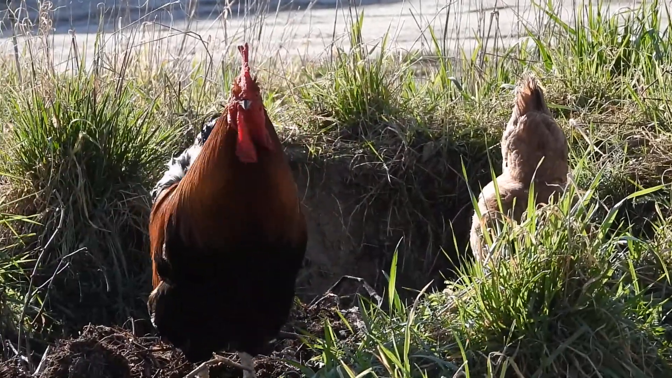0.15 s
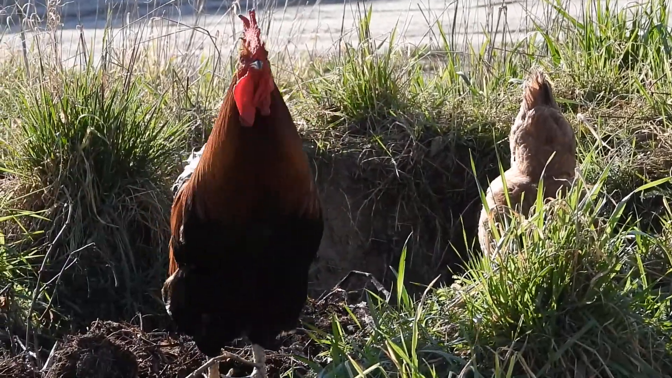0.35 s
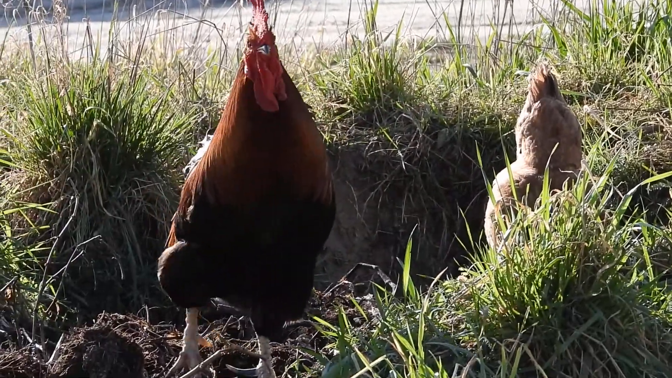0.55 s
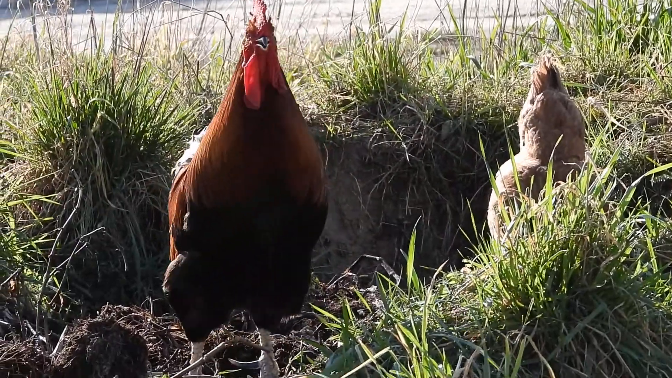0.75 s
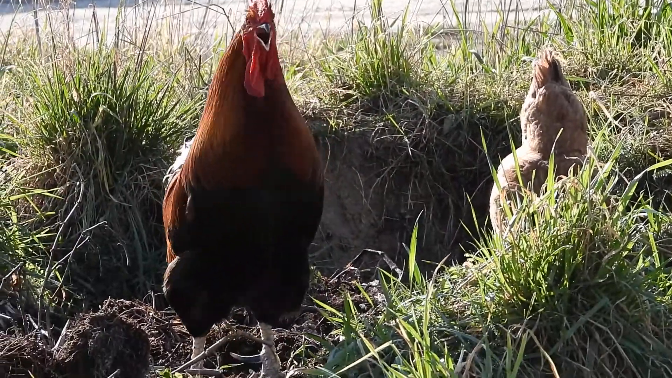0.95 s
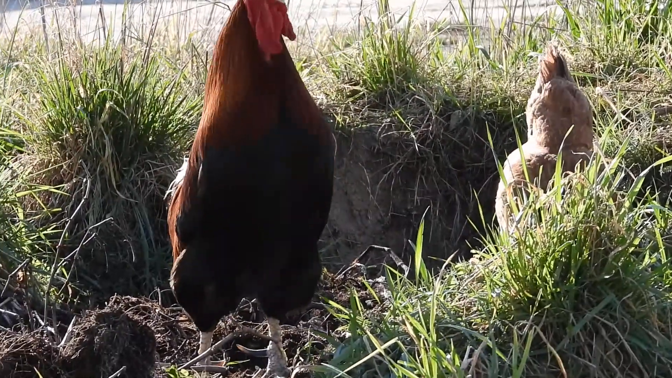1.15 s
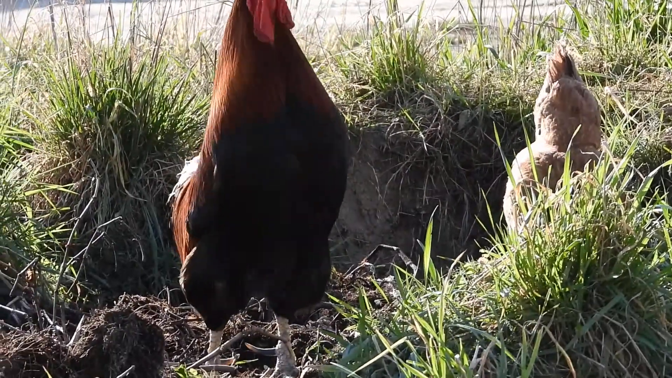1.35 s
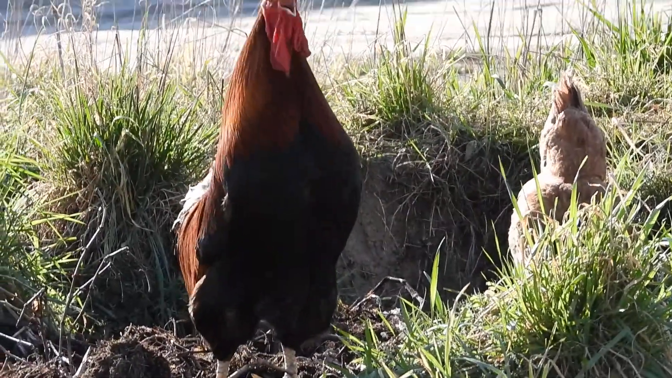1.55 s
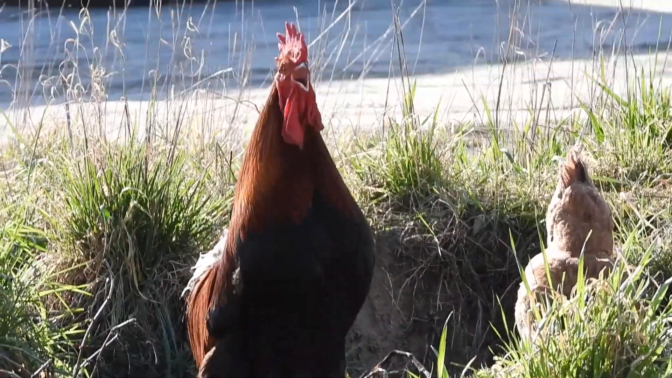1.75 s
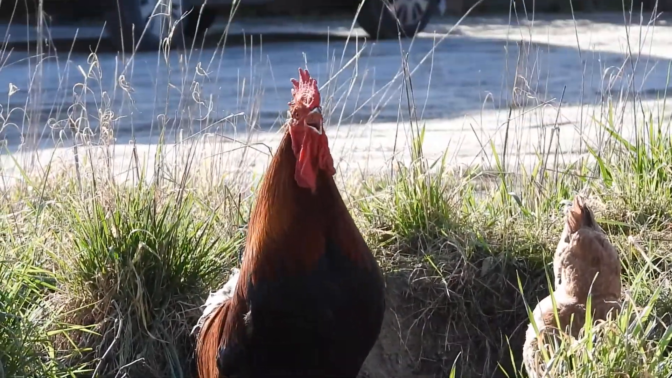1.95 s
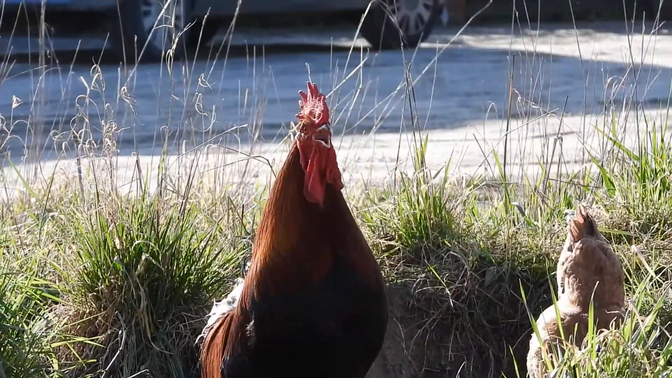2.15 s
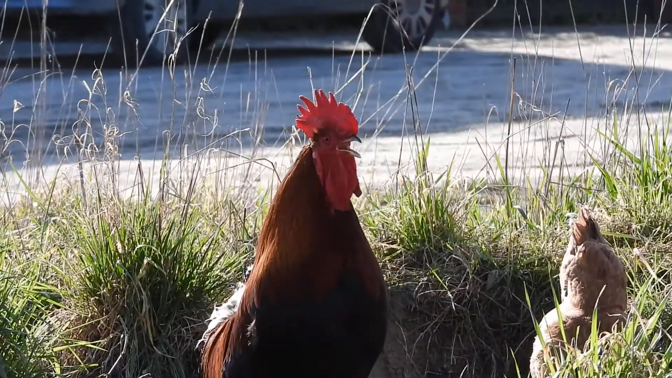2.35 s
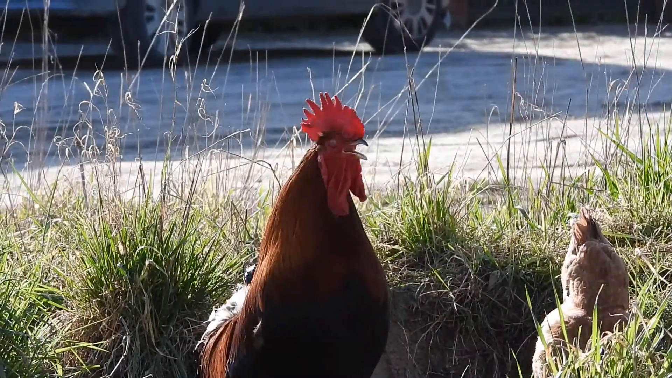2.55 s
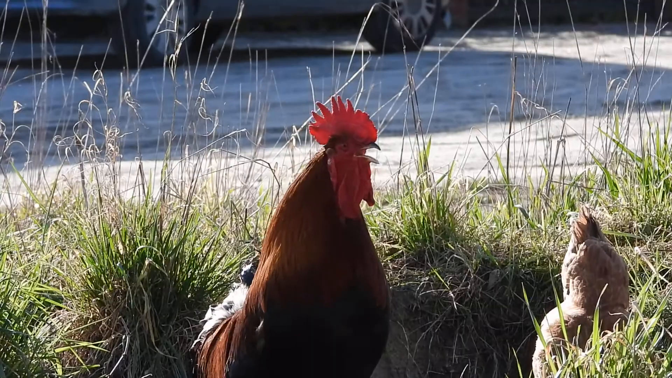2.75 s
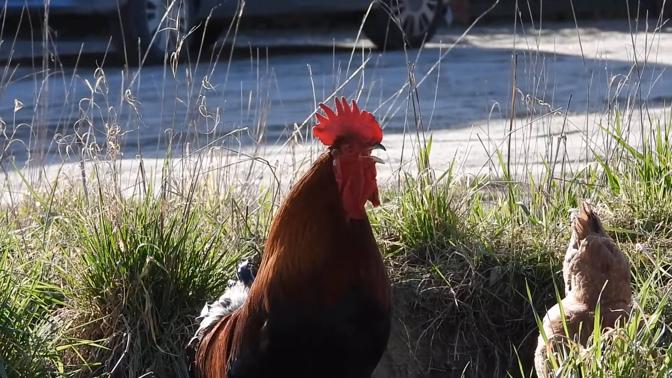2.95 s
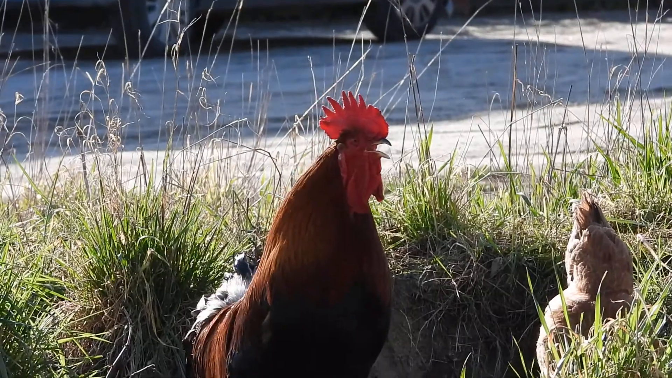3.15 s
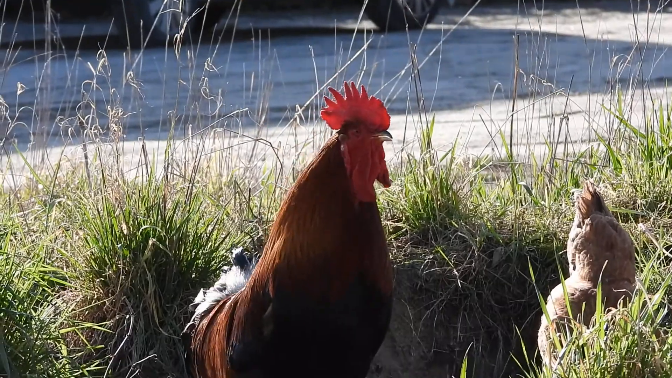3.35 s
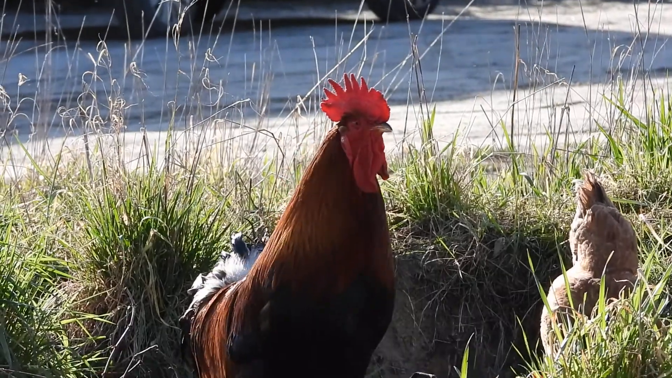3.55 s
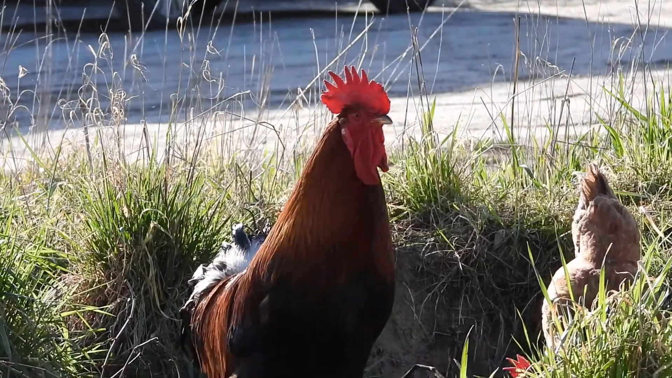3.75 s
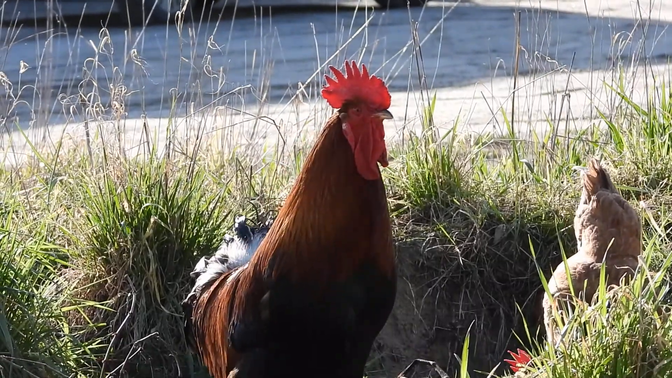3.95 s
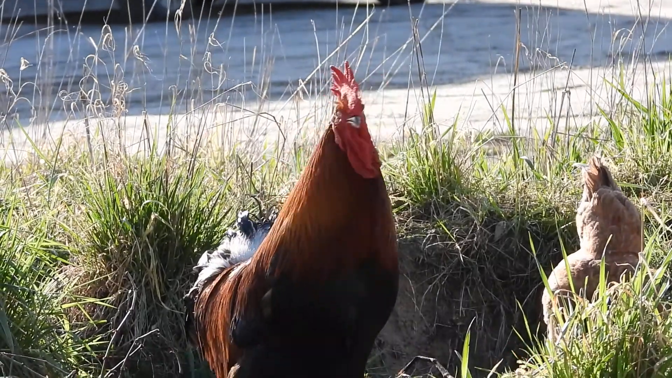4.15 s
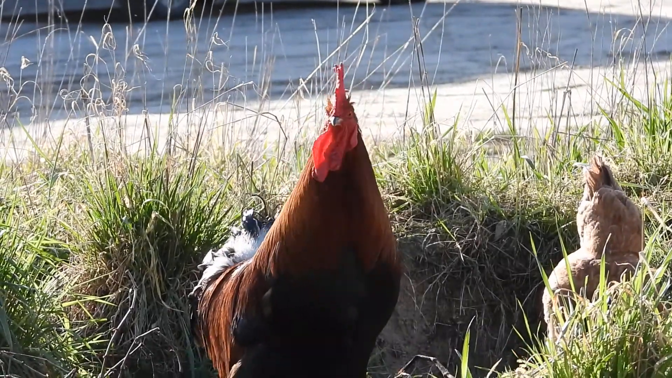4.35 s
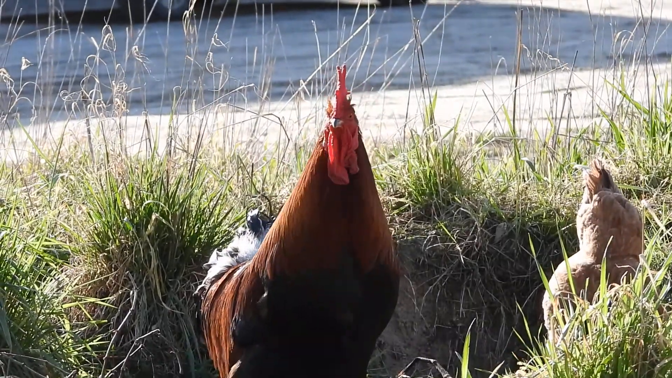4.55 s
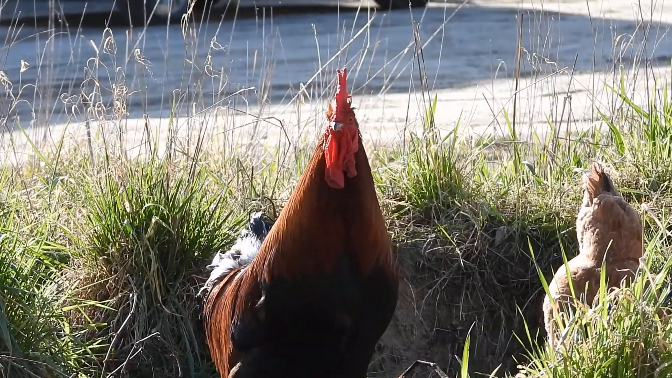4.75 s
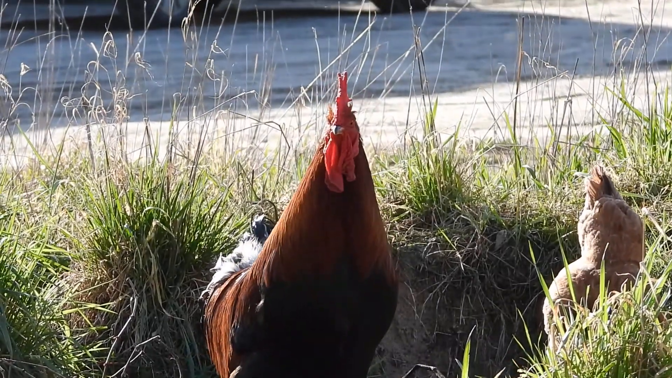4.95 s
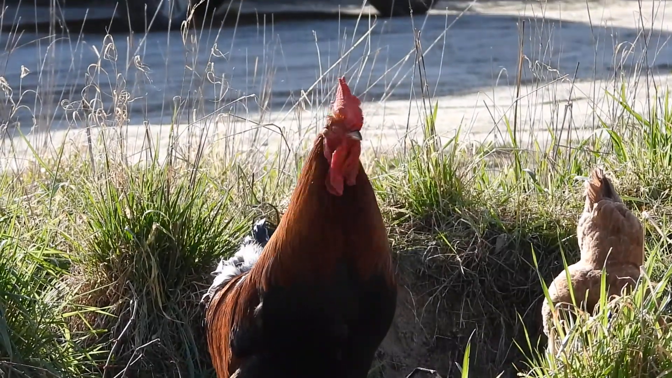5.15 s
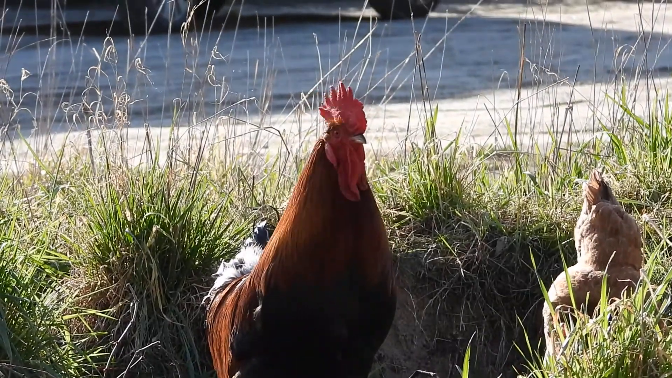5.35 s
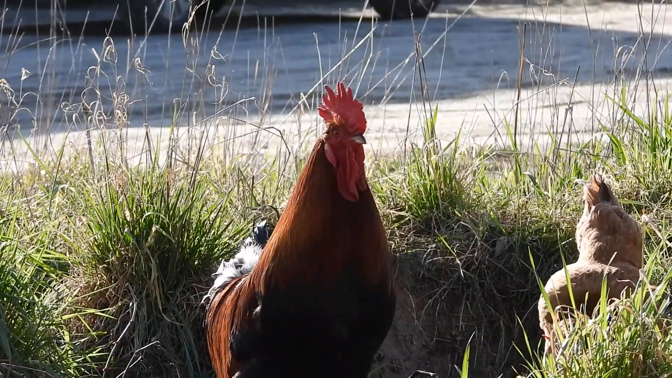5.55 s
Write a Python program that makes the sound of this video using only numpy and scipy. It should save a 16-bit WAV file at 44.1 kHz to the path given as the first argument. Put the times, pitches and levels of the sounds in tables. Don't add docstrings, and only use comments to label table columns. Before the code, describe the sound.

A rooster close by gives one loud, raspy, drawn-out crow over faint sparrow chirps, a soft hen cluck and low distant traffic hum.

```python
import sys
import numpy as np
from scipy import signal
from scipy.fft import rfft, irfft, next_fast_len
from scipy.io import wavfile
from scipy.ndimage import uniform_filter1d, minimum_filter1d, map_coordinates

SR = 44100
rng = np.random.default_rng(int(sys.argv[2]) if len(sys.argv) > 2 else 0)


def dump(signal):
    limited = np.clip(np.atleast_2d(signal).T, -1, 1)
    pcm = np.round(limited * 32767).astype(np.int16)
    wavfile.write(sys.argv[1], SR, pcm)


def boost_factor(decibels):
    exponent = np.asarray(decibels, float) / 20
    return 10 ** exponent


N = 247822

# time in seconds, level in dB.
TRAFFIC_LEVEL = [(0, -56), (1.1, -55.5), (1.3, -53.5), (2.5, -56), (3.3, -55), (3.6, -55), (4.5, -55.5),
                 (5.62, -56)]
# frequency in Hz, density in dB per Hz.
TRAFFIC_COLOUR = [(18, -99.5), (30, -48.5), (54, -60.5), (182, -7.5), (295, -9.5), (529, -5.5), (903, -4),
                  (974, -0.5), (1540, -10.5), (1700, -15), (3840, -19), (4250, -19.5), (5910, -30),
                  (8230, -32.5), (13000, -72)]
# frequency in Hz, likeness from -1 to 1.
STEREO_LIKENESS = [(60, 1), (130, 1), (290, 0.86), (640, 0.84), (1410, 0.58), (3100, -0.055), (6820, -0.28),
                   (15000, -0.26)]
# frequency in Hz, left minus right in dB.
BACKGROUND_TILT = [(60, -4.5), (110, -7), (200, -0.5), (380, 3), (700, 3), (1290, 3.5), (2380, 4.5),
                   (4400, 1), (8120, -5), (15000, -12)]
# time in seconds, length in seconds, level in dB.
GRASS_RUSTLES = [(.22, 0.041, -56.5), (0.469, 0.039, -50.5), (0.552, 0.027, -55), (.91, 0.059, -53),
                 (3.667, 0.027, -46.5), (5.463, 0.03, -50.5)]
# time in seconds, length in
# seconds, level in dB.
LOW_THUMPS = [(3.11, 0.03, -48), (3.17, 0.07, -52), (3.445, 0.016, -39)]
# frequency in Hz, time to fall 60 dB in seconds.
YARD_DECAY = [(300, 0.33), (550, 1), (1500, 0.75), (3500, 0.12), (8000, 0.36)]
# time in seconds, pitch in Hz, level in dB.
FLOCK_OUTBURSTS = [(.19, 4110, -58), (4.8, 3550, -60), (5.08, 4050, -62), (5.21, 3930, -51),
                   (5.57, 4090, -59.5)]
# time in seconds, pitch in Hz, level in dB.
FAR_WHISTLES = [
    [(.41, 2210, -47), (.425, 1950, -67), (.455, 1950, -49), (.47, 3360, -40), (.48, 4300, -45),
     (.495, 5000, -53), (.53, 5150, -68)],
    [(.5, 2520, -53), (.54, 2655, -50), (.6, 2660, -49), (.675, 2530, -57)],
    [(3.632, 3094, -63), (3.645, 3090, -51), (3.69, 3070, -48)],
    [(4.31, 2350, -65), (4.36, 2370, -45.5), (4.385, 2490, -46), (4.43, 2610, -50), (4.51, 2596, -55),
     (4.58, 2660, -75)],
    [(4.85, 8500, -78), (4.88, 8400, -72), (4.93, 8300, -77), (5.0, 8200, -78)],
]
# seconds after its start, pitch in Hz, level in dB.
SPARROW_CHIRP = [(0, 3300, -18), (.008, 3260, -1), (0.025, 5200, -2.5), (.042, 3380, 2), (0.048, 3030, -18),
                 (0.051, 3560, 14.5), (0.063, 3415, -0.5), (.069, 3400, -1), (0.084, 3350, -4)]
# start in seconds, level in dB, pitch factor, length factor,
# left minus right in dB.
SPARROW_CALLS = [(0.077, -49, .95, 1.1, 10.5), (3.03, -45.5, 1.07, 0.62, 8.5), (3.643, -45, 1.05, 0.88, 7),
                 (4.408, -46.5, 0.992, 0.82, 10.5), (5.442, -46, 1.014, 1.01, 7)]
# time in seconds, pitch in Hz, level in dB.
HEN_CLUCK = [(3.075, 296.3, -79), (3.095, 256.6, -44), (3.14, 306, -55), (3.25, 295, -44), (3.33, 290, -74)]
# time in seconds, level in dB, pitch in Hz,
# chest tone in dB relative to the level.
CROW_SYLLABLES = [
    [(1.12, -27, 499, -28.5), (1.128, -15, 521.9, -16), (1.14, -16.5, 563, -9.5), (1.185, -16, 654.6, -14),
     (1.25, -12.5, 683, -16), (1.3, -13.5, 647, -15), (1.335, -20, 609.8, -21.5), (1.35, -39.5, 592, -33.5)],
    [(1.392, -111, 561, -14), (1.398, -17.5, 554.3, -21.5), (1.43, -12.5, 666.7, -2),
     (1.476, -10.5, 673.5, -9.5), (1.56, -14.5, 642, -14)],
    [(1.59, -19, 622.4, -15), (1.72, -12, 639.8, -16), (2.07, -15, 641.3, -18.5), (2.22, -19, 641, -3.5),
     (2.47, -21.5, 639.6, -10.5), (2.8, -22.5, 630.5, -6.5), (3.0, -22.5, 623.8, -8),
     (3.15, -21.5, 612.5, -9), (3.21, -23.5, 602, -11)],
    [(3.28, -21.5, 591.3, -13.5), (3.365, -25, 568, -16.5), (3.386, -28, 566, -6), (3.416, -22, 540.4, 3),
     (3.44, -27.5, 523.2, -1.5), (3.48, -50, 401, -8)],
]
VOICE_REGISTERS = [(1.1, .8, 0, 0, 0), (1.135, .42, 0, .12, 0), (1.235, .58, 0, .4, 0), (1.38, .8, 0, 0, 0),
                   (1.41, .35, 0, 0, 0), (1.435, .5, .2, 0, 0), (1.446, .02, .98, 0, 0),
                   (1.521, .9, .1, 0, 0), (1.705, .6, .4, 0, 0), (2.07, .82, .14, 0, 0),
                   (2.17, .55, .05, 0, .45), (2.25, .06, 0, 0, .62), (2.38, .73, 0, 0, 0),
                   (2.74, .3, 0, .1, 0), (2.8, .012, 0, .16, 0), (2.895, .08, 0, .18, 0),
                   (2.95, .005, 0, .22, 0), (3.1, .003, 0, .38, 0), (3.18, .003, 0, .7, 0),
                   (3.315, .004, 0, .06, 0), (3.405, .35, 0, .45, 0), (3.44, .8, 0, 0, 0)]
# time in seconds, neck (0 stretched, 1 lowered, 2 slack).
NECK_POSTURE = [(1.12, 0.84), (1.18, 2), (1.33, -0.07), (1.44, 0), (2.36, 0.43), (2.4, 1.32), (2.78, 1.16),
                (3.25, 2.5), (3.42, 1.79)]
# resonance in Hz, width in Hz, level in dB.
STRETCHED_NECK = [(383, 390, -17.5), (742, 313, -4.5), (1507.5, 82, 12), (2074, 148, 14), (3100, 920, -14),
                  (4607, 520, 2), (5534, 360, 2.5), (6297, 660, -4), (7830, 210, -19), (9160, 420, -45)]
# resonance in Hz, width in Hz, level in dB.
LOWERED_NECK = [(356, 210, -9.5), (700, 960, -12), (1404, 89, 6.5), (1950, 112, 4), (2934, 310, -10),
                (4680, 550, 1.5), (5520, 230, 2), (6580, 74, -5), (8700, 140, -18), (10220, 640, -38)]
# resonance in Hz, width in Hz, level in dB.
SLACK_NECK = [(300, 150, -34), (880, 200, -24), (1280, 350, -2), (1900, 450, 0), (2880, 450, -23),
              (4050, 600, 0), (5050, 400, -3), (6500, 600, 0), (8700, 600, -14), (10300, 1000, -22)]
RESONANCE_SIGN = np.array([1, 1, -1, 1, -1, -1, 1, -1, -1, 1])
UPPER_LEVEL_DB = [-9.5, -19.5, -15]
# frequency in Hz, width in Hz, share swallowed from 0 to 1.
SIDE_CAVITIES = [(1070, 170, .93), (2480, 600, .95), (3600, 800, .92), (5320, 220, .85), (7250, 300, .95),
                 (9100, 300, .6)]
# frequency in Hz, left minus right in dB.
CROW_TILT = [(100, -13.5), (380, 8.5), (700, -1), (1300, 2.5), (2000, -3.5), (3000, -5.5), (4500, 5.5),
             (6000, -3), (8100, -4.5), (13000, -1.5)]
# frequency in Hz, lead of the left in radians.
CROW_PHASE = [(0, 1.5), (2240, 0.0), (2670, 6.5), (4220, 8.5), (5250, 6), (5940, 1.5), (7060, 8), (7840, 4),
              (9130, 11), (9990, 40.5), (10200, 21), (11500, 21), (12400, 21.5), (15200, 4)]


def unit(x):
    return x / np.sqrt(np.mean(x ** 2) + 1e-20)


def along(points, hz):
    f, v = np.transpose(points)
    return np.interp(np.log(hz + 1), np.log(f + 1), v)


def curves(rows):
    s, *columns = np.transpose(rows)
    t = np.arange(N) / SR
    gate = np.clip(np.minimum(t - s[0], s[-1] - t) / 0.0016, 0, 1)
    return [np.interp(t, s, column) for column in columns] + [gate]


def wobble(rate):
    knots = rng.standard_normal(int(N * rate / SR) + 4)
    return map_coordinates(knots, [np.arange(N) * rate / SR])


def filtered(x, response):
    m = next_fast_len(N + SR // 2)
    return irfft(rfft(x, m) * response(np.fft.rfftfreq(m, 1 / SR)), m)[..., :N]


def steady(x):
    return x / np.sqrt(np.abs(uniform_filter1d(x ** 2, SR // 25)) + 1e-12)


def ring(f, hz, width):
    return 1j * f * width / (hz * hz - f * f + 1j * f * width)


def sides(db):
    return boost_factor([[db / 2], [-db / 2]])


def rush(spectrum, patchy_db):
    z = signal.stft(rng.standard_normal((2, N)), nperseg=512)[2]
    field = uniform_filter1d(rng.standard_normal(z.shape[1:]), 6, 0)
    field = uniform_filter1d(field, 10, 1)
    pair = signal.istft(z * boost_factor(patchy_db * unit(field)), nperseg=512)[1][:, :N]

    def mid_and_side(hz):
        turn = np.arccos(np.clip(along(STEREO_LIKENESS, hz), -1, 1)) / 2
        return boost_factor(along(spectrum, hz)) * [np.cos(turn), np.sin(turn)]

    mid, side = filtered(pair, mid_and_side)
    tilt = lambda hz: boost_factor(np.outer([.5, -.5], along(BACKGROUND_TILT, hz)))
    return unit(filtered(np.array([mid + side, mid - side]), tilt))


def far_traffic():
    level_db = curves(TRAFFIC_LEVEL)[0] + 6.0 + 0.65 * wobble(12)
    treble_end = lambda f: 1 / (1 + (f / 7300) ** 24)
    return boost_factor(level_db) * filtered(rush(TRAFFIC_COLOUR, patchy_db=1.5), treble_end)


def bursts(rows):
    t = np.arange(N) / SR
    return sum(boost_factor(db) * np.exp(-((t - s) / length) ** 2) for s, length, db in rows)


def grass():
    colour = [(500, -80), (1500, -10), (4000, -0.5), (7000, -12.5), (10000, -32), (13000, -70)]
    crackle = boost_factor(1.94 * wobble(270))
    return bursts(GRASS_RUSTLES) * crackle * rush(colour, patchy_db=4)


def low_thumps():
    colour = [(30, -50), (90, -20), (200, -7), (380, 3), (600, -7), (1500, -95)]
    return bursts(LOW_THUMPS) * rush(colour, patchy_db=3)


def yard(x, delay):
    hz, t, z = signal.stft(rng.standard_normal((2, SR // 2)), SR, nperseg=256)
    decay = boost_factor(-60 * t / along(YARD_DECAY, hz)[:, None])
    tail = signal.istft(z * decay, SR, nperseg=256)[1]
    late = np.pad(np.atleast_2d(x), ((0, 0), (round(delay * SR), 0)))
    return signal.fftconvolve(late, tail / np.linalg.norm(tail[0]), axes=1)[:, :N]


def note(rows, warble_db, overtone_db, shake, rate):
    hz, db, gate = curves(rows)
    phase = 2 * np.pi * np.cumsum(hz * (1 + shake * wobble(2.0 * rate))) / SR
    level = boost_factor(db - 2 + warble_db * wobble(rate))
    return gate * level * (np.sin(phase) + boost_factor(overtone_db) * np.sin(2 * phase))


def far_flock():
    murmur_db, swell_s = -75.5, 0.064
    swells = []
    for s, hz, db in FLOCK_OUTBURSTS:
        swells += [(s - swell_s, hz, murmur_db), (s, hz, db), (s + swell_s, hz, murmur_db)]
    swells.sort()
    flock = sum(note(swells, warble_db=9, overtone_db=-40, shake=.07, rate=40) for bird in range(3))
    return sides(4.2) * yard(flock, delay=0)


def far_whistlers():
    calls = [note(rows, warble_db=2.0, overtone_db=-39, shake=0.0092, rate=330) for rows in FAR_WHISTLES]
    return sum(calls) * sides(4.2)


def sparrows():
    out = 0
    for s, db, pitch, length, pan_db in SPARROW_CALLS:
        rows = [(s + t * length, hz * pitch, db + level) for t, hz, level in SPARROW_CHIRP]
        out += note(rows, warble_db=3.5, overtone_db=-30, shake=.07, rate=300) * sides(pan_db)
    return out


def hen():
    return note(HEN_CLUCK, warble_db=2.5, overtone_db=-12, shake=.04, rate=60) * sides(2.2)


def registers():
    switch_s = .022
    s, *shares = np.transpose(VOICE_REGISTERS)
    row = np.clip(np.searchsorted(s, np.arange(N) / SR) - 1, 0, None)
    return np.abs(uniform_filter1d(np.array(shares)[:, row], size=round(switch_s * SR)))


def high_membrane_hz():
    before_hz, top_hz, after_hz = 772, 815, 770
    leap_s, leap_length_s = 1.488, .016
    t = np.arange(N) / SR - leap_s
    rest_hz = np.where(t < 0, before_hz, after_hz)
    return rest_hz + (top_hz - rest_hz) * np.exp(-(t / leap_length_s) ** 2)


def pulses(pitch_hz, size):
    turns = np.cumsum(pitch_hz) / SR
    cycle = np.arange(1, int(turns[-1]))
    at = np.interp(cycle, turns, np.arange(N))
    taps = at.astype(int)[:, None] + np.arange(-7, 9)
    away = taps - at[:, None]
    shape = np.sinc(away) * np.cos(away * np.pi / 16) ** 2
    strength = size(at.astype(int), cycle)[:, None]
    return np.bincount(np.clip(taps, 0, N - 1).ravel(), (shape * strength).ravel(), N)


def throat(x, chaos, bright_db, width):
    neck = np.abs(curves(NECK_POSTURE)[0] + .22 * chaos * wobble(25))

    def beak_and_cavities(f):
        beak = (1j * f / (260 + 1j * f)) ** 5 / (1 + (f / 11300) ** 13)
        return beak * np.prod([1 - share * ring(f, hz, w) for hz, w, share in SIDE_CAVITIES], axis=0)

    x = filtered(x, beak_and_cavities)
    out = 0
    for place, modes in enumerate([STRETCHED_NECK, LOWERED_NECK, SLACK_NECK]):
        def lower_and_upper(f):
            rings = np.array([boost_factor(db) * ring(f, hz, w * width) for hz, w, db in modes])
            return np.add.reduceat(rings * np.reshape(RESONANCE_SIGN, (-1, 1)), [0, 5])

        both = filtered(x[:, None], lower_and_upper)
        share = np.clip(1 - np.abs(neck - place), 0, 1)
        out += share * (both[:, 0] + boost_factor(UPPER_LEVEL_DB[place] + bright_db) * both[:, 1])
    return steady(out)


def rooster():
    level_db, pitch_hz, chest_db = uniform_filter1d(curves(sum(CROW_SYLLABLES, []))[:3], SR // 200)
    gate = curves(CROW_SYLLABLES[0])[-1] + curves(sum(CROW_SYLLABLES[1:], []))[-1]
    chaos, high, second, third = registers()
    bright_db = 0.13 * (level_db + 9)

    low_hz = pitch_hz * (1 + 0.0032 * wobble(60) + 0.0046 * wobble(500) + 0.0214 * chaos * wobble(90))
    high_hz = high_membrane_hz() * (1 + 0.0083 * wobble(70) + .008 * wobble(500))
    low = pulses(low_hz, lambda i, k: 1 + second[i] * (-1) ** k + third[i] * np.cos(2 * np.pi * k / 3))
    upper = pulses(high_hz, lambda i, k: 1 + 0.62 * (-1) ** k * (chaos[i] > .1))
    upper = filtered(upper, lambda f: 1.9 + ring(f, 1410, 450))

    tug = np.cos(2 * np.pi * np.cumsum(high_hz * boost_factor(.25 * wobble(120))) / SR)
    beating_hz = low_hz * boost_factor(.45 * wobble(250))
    beating = pulses(beating_hz, lambda i, k: .45 + tug[i] + rng.normal(0, .22, len(k)))
    throb = 1 + .25 * np.cos(2 * np.pi * np.cumsum(55 * boost_factor(2.5 * wobble(30))) / SR)

    tones = throat(np.array([low, upper]), chaos, bright_db, width=0.44)
    rasp = throat(beating[None], chaos, bright_db, width=.6)[0]
    rasp = rasp * boost_factor(.5 * wobble(130)) * throb
    low_share = np.clip(1 - chaos - high, 0, 1)
    voice = np.sqrt(low_share) * tones[0] + np.sqrt(high) * tones[1] + np.sqrt(chaos) * rasp
    chest = np.sin(2 * np.pi * np.cumsum(low_hz) / SR)
    chest = chest * boost_factor((2 + 9 * high) * chaos * wobble(60)) * (1 - high)
    return gate * boost_factor(level_db) * (voice + boost_factor(chest_db + 6.5) * chest)


def crow_in_stereo(crow):
    def ports(hz):
        tilt = boost_factor(np.outer([.5, -.5], along(CROW_TILT, hz)))
        lead = np.exp(1j * np.outer([.5, -.5], along(CROW_PHASE, hz)))
        bass_cut = hz ** 6 / (hz ** 6 + 200.0 ** 6)
        return tilt * lead * bass_cut

    return filtered(np.array([crow, crow]), ports)


def scene():
    background = far_traffic() + grass() + low_thumps()
    birds = far_whistlers() + sparrows() + hen()
    crow = rooster()
    crow_walls = boost_factor(-29) * yard(crow, delay=0.05) + boost_factor(-23) * yard(crow, delay=0.0036)
    bird_walls = boost_factor(-8) * yard(birds, delay=0.011)
    return background + far_flock() + birds + crow_walls + bird_walls + crow_in_stereo(crow)


def band_limit(x):
    return signal.sosfilt(signal.butter(12, 15710, fs=SR, output="sos"), x)


def record(dry):
    ceiling, window = .85, SR // 100
    needed = np.minimum(1, ceiling / (np.abs(dry).max(axis=0) + 1e-9))
    gain = uniform_filter1d(minimum_filter1d(needed, size=window), size=window)
    return band_limit(dry * gain)


dry = scene()
out = record(dry)
dump(out)
```